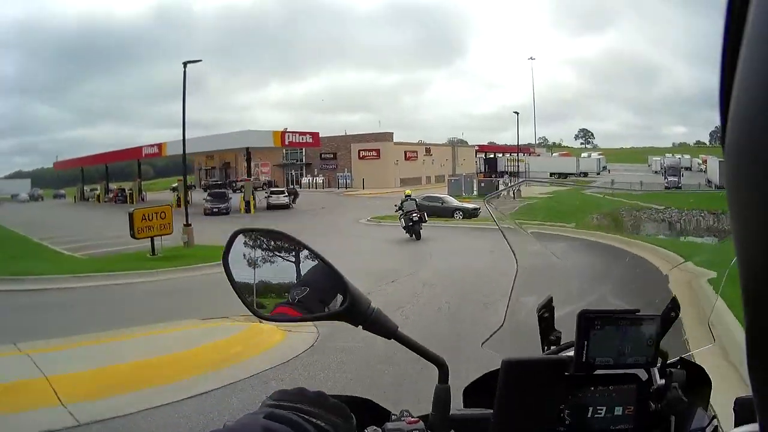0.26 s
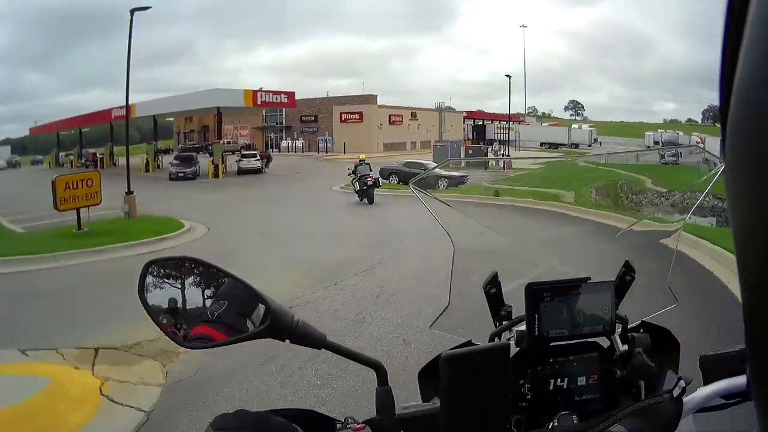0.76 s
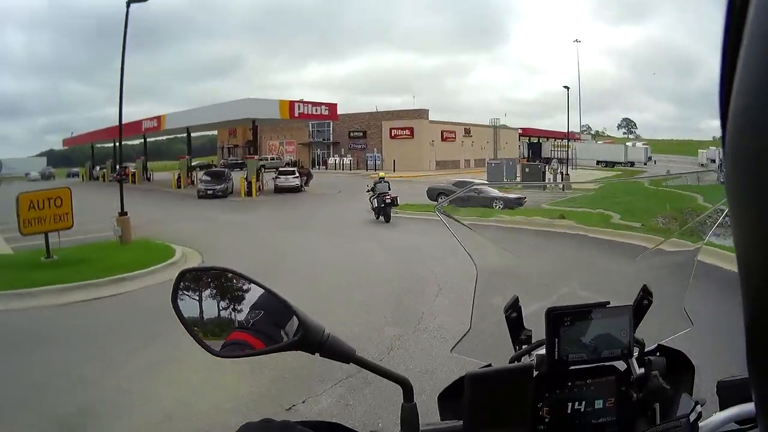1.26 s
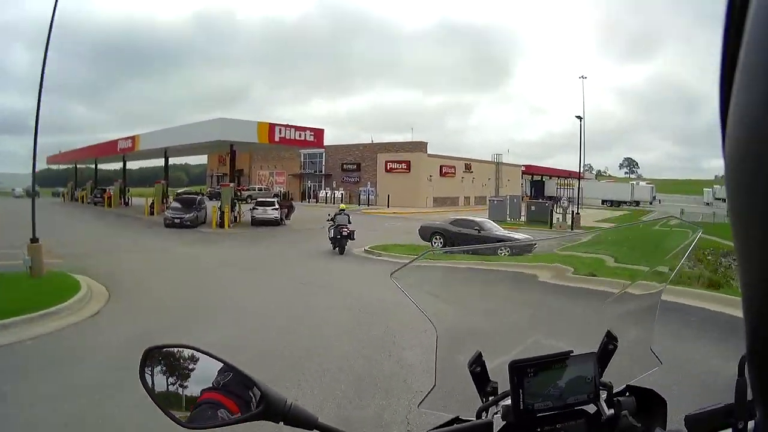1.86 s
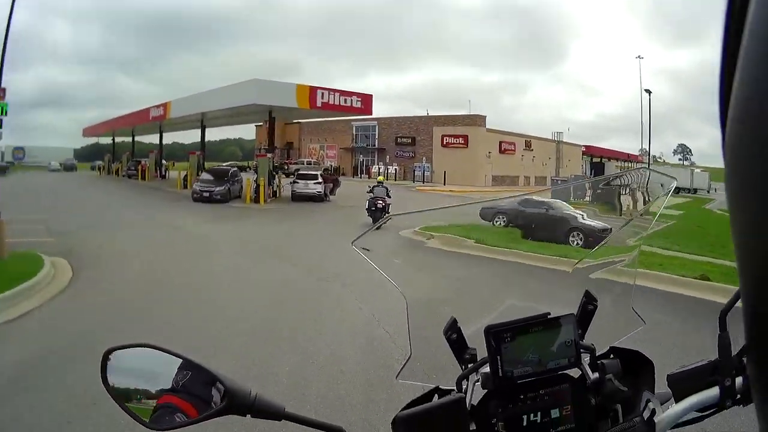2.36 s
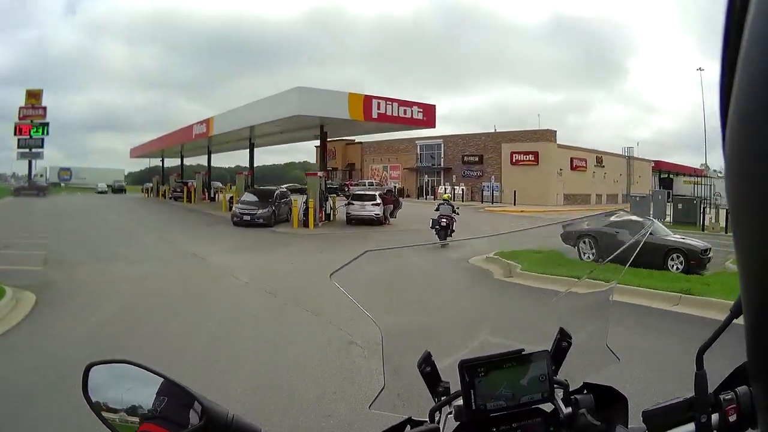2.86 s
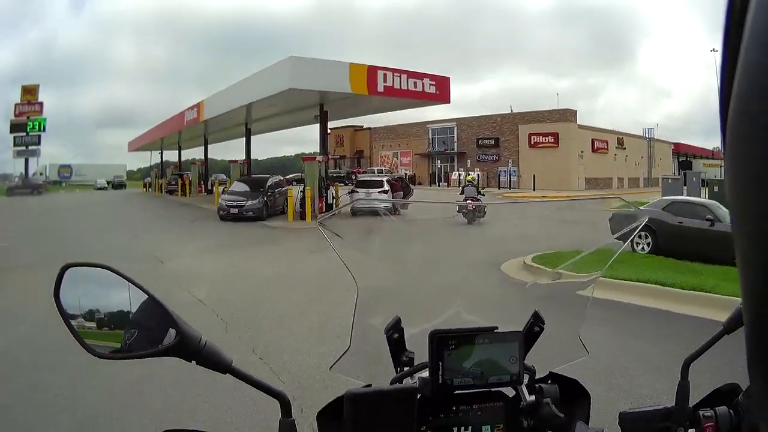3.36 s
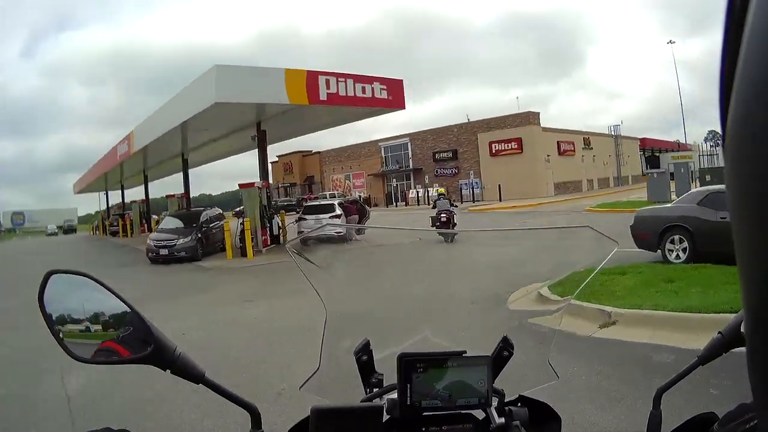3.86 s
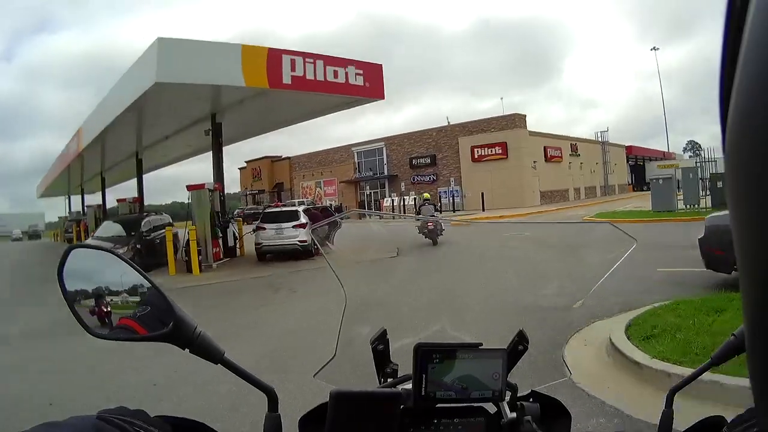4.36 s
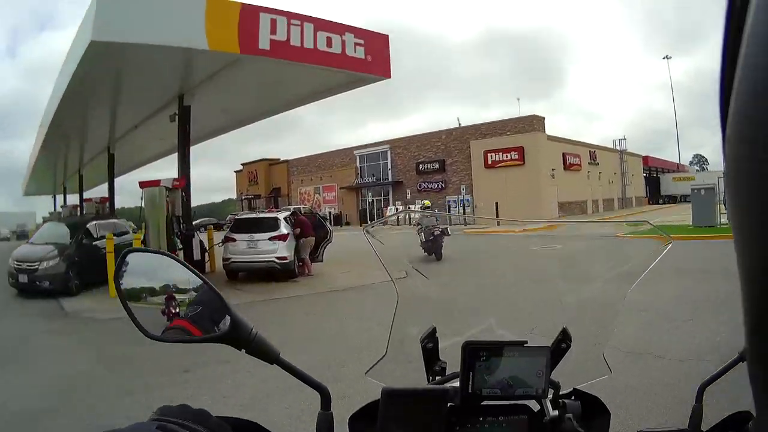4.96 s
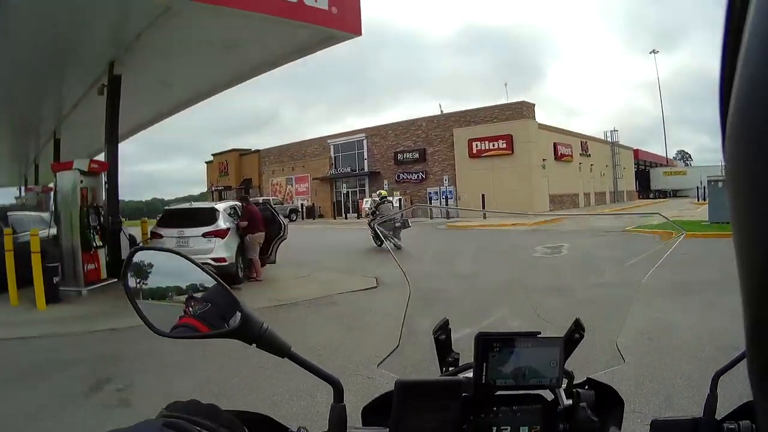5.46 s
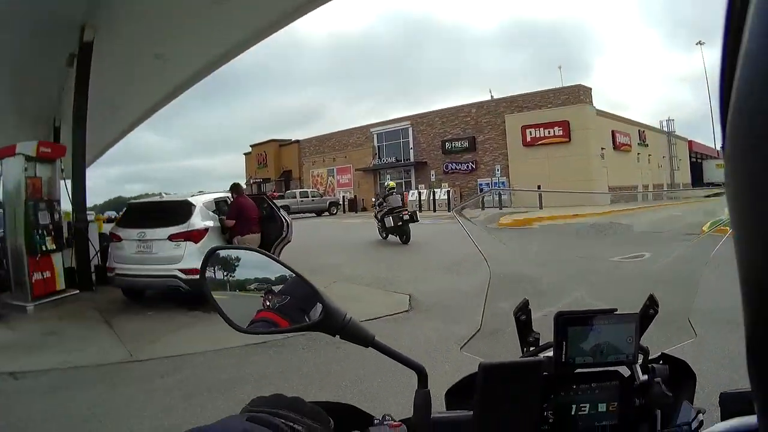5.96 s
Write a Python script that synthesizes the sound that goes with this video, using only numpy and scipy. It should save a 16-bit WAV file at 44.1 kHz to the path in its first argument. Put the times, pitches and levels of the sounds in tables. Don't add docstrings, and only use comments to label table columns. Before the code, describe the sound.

A close, mono helmet microphone on a motorcycle rolling slowly across an open forecourt. Throughout, a two-cylinder engine throbs low and even at about 27 firings a second, with pulsing casing clatter, valve hiss and faint metallic tappet rings. The start opens on the tail of a gust, with quick pops and flutter. From 0.7 to 1.0 s, wind slaps the microphone hard, with deep thumps, cracks and strap flicks on the shell. Scattered lighter puffs follow until 1.6 s, then the engine dominates, dipping slightly in strength until about 3. Slaps return at 2.7 s and cluster from 3.1 to 3.5 s, with a sharp buckle knock near 3.17. Sparser bumps continue. Around 4.6 to 4.95 s a thin gear whine rises briefly and slides down as the clutch goes in; the engine slows to a softer idle near 20 beats a second. Heavy thumps come at 5.6 to 5.7 s, smaller ones near 6.

```python
import sys
import numpy as np
from scipy import signal
from scipy.fft import rfft, irfft
from scipy.io import wavfile
from scipy.ndimage import uniform_filter1d

SR = 44100
rng = np.random.default_rng(int(sys.argv[2]) if len(sys.argv) > 2 else 0)


def store_pcm(level_fs):
    pcm = np.round(np.clip(level_fs, -1, 1) * 32767).astype(np.int16)
    wavfile.write(sys.argv[1], SR, np.atleast_2d(pcm).T)


def convert_level_to_amplitude(level_db):
    exponent = np.asarray(level_db, float) / 20
    return 10 ** exponent


N = 273420
T = np.arange(N) / SR

# time in seconds, turns counted so far.
CRANK_TURNS = [(0, .35), (.5, 13.6), (1, 27.2), (1.5, 41.1), (2, 55.05), (2.5, 69.1), (3, 83.0),
               (3.5, 96.8), (4, 110.4), (4.5, 123.9), (4.75, 130.4), (5, 136.3), (5.25, 141.3),
               (5.5, 146.25), (6, 156.2), (6.2, 160.1)]
# time in seconds, load in dB.
ENGINE_LOAD = [(0, 1), (.53, 1), (1.6, 1), (1.67, -2.5), (1.9, -4.5), (2.05, -2.5), (2.07, -0.5),
               (2.11, -3.5), (2.3, -1), (2.66, -5), (2.78, -0.3), (2.9, -3.5), (3.06, 0), (3.8, 0.35),
               (5.33, -1.5), (6.2, -1)]
# multiple of crank speed, level in dB.
EXHAUST_ORDERS = [(.5, -18), (1, -4), (1.5, -14), (2, -1), (2.5, -13), (3, -6), (3.5, -17), (4, -8),
                  (5, -10), (6, -19), (7, -13), (8, -20), (9, -15), (10, -14)]
# frequency in Hz, level in dB per Hz.
CASING_COLOUR = [(200, -10), (280, -13), (340, -7.5), (700, -5.5), (1150, -11.5), (1460, -9.5),
                 (1800, -17.5), (2350, -21.5), (2800, -30), (3700, -31), (5000, -29)]
# frequency in Hz, level in dB per Hz.
VALVE_COLOUR = [(2000, 0.5), (3400, -4.5), (4100, -7), (4900, -2.5), (6000, -5), (7700, -4), (9400, 0),
                (11000, -3.5), (13300, -6.5), (14600, -18)]
# frequency in Hz, level in dB per Hz.
FIZZ_COLOUR = [(5500, -9), (7600, -3), (8700, 1.5), (9400, 4.5), (10300, 0.5), (12500, -6), (14500, -35)]
# time in seconds, pitch in Hz, level in dB.
GEAR_WHINE = [
    (3.0, 4720, -80),
    (3.3, 4700, -65),
    (4.35, 4760, -63),
    (4.5, 4740, -66),
    (4.6, 4700, -59.5),
    (4.78, 4680, -59),
    (4.835, 4630, -53),
    (4.87, 4450, -59),
    (4.92, 4380, -59),
    (4.97, 4350, -80),
]
# time in seconds, pitch in Hz, level in dB.
TAPPET_RING = [(0, 2330, -53), (.7, 2400, -54), (1.5, 2350, -70), (4.95, 2350, -62), (5.15, 2320, -55),
               (5.3, 2320, -52), (5.6, 2330, -53), (6.2, 2350, -53)]
# time in seconds, pitch in Hz, level in dB.
ROCKER_RING = [(0, 1450, -58), (1.8, 1480, -55), (2.5, 1450, -55), (3, 1450, -60), (5.0, 1450, -58),
               (5.3, 1420, -52), (6.2, 1420, -52)]
# time in seconds, depth in dB, width in ms, crack in dB.
HARD_TUGS = [(.0013, -19, 0.69, -26.5), (.0378, -16.5, 4, -29.5), (.0149, -19, 0.63, -28),
             (.0161, -19, 0.73, -32), (.027, -21, 2.2, -32), (.6984, -8, 1.54, -24.5),
             (.8014, -19, 0.78, -39), (.8254, -10.5, 2.6, -24.5), (.8329, -5, 3.2, -35),
             (.7077, -13.5, 2, -34), (.9053, -24, 3, -40), (2.728, -14, 2, -40), (4.8519, -15, 1.4, -44),
             (3.1363, -15, 0.94, -38), (.8459, -19, 0.49, -27), (.8942, -2.5, 2.7, -18.5),
             (.9686, -10, 2.2, -35), (1.2497, -16.5, 1.7, -58), (1.4336, -18, 1, -46),
             (2.7167, -13.5, 2, -38), (2.7881, -5.5, 2.44, -34.5), (2.8172, -18.5, 1.6, -31),
             (3.1262, -15, 1.03, -40), (3.1659, -10, 2.8, -36), (3.1755, -11, 1.8, -34),
             (3.2372, -8, 1.47, -31.5), (3.2357, -12, 1.5, -34), (3.461, -16, 1.5, -30),
             (3.4908, -13.5, 3., -38), (3.503, -21, 1.1, -33), (3.8926, -12.5, 3.9, -45),
             (4.013, -13.5, 1.5, -35), (4.3939, -11, 2.5, -48), (4.8293, -21.5, 1.1, -28),
             (4.847, -11.5, 1.5, -30.5), (4.8847, -17, 2.2, -30), (5.6872, -3.5, 3.6, -35),
             (5.712, -11, 2.7, -41), (5.7005, -18, 2.4, -51), (5.6825, -9, 4.2, -44),
             (3.173, -18, 1.6, -30), (5.9546, -10, 1.27, -46), (5.9736, -14.5, 1.9, -31)]
# time in seconds, depth in dB.
SOFT_TUGS = [(0.283, -20), (0.5248, -27), (0.6825, -12.5), (0.757, -13), (0.7333, -14.5), (0.719, -11.5),
             (0.7458, -18), (0.768, -16), (0.807, -7), (0.938, -15), (1.0788, -14.5), (1.2024, -16.5),
             (1.4077, -13.5), (1.56, -23.5), (1.63, -33), (2.7308, -9), (2.991, -19), (3.1, -9),
             (3.2624, -17), (3.3866, -16), (3.431, -18), (3.58, -15.5), (3.707, -22), (3.927, -17.5),
             (4.534, -20), (4.6216, -19), (4.768, -17), (4.892, -15.5), (4.895, -16), (4.978, -14.5),
             (5.302, -17.5), (5.6201, -11), (5.6145, -15), (5.6123, -7), (5.819, -14.5), (6.1631, -13.5),
             (6.1861, -10), (6.172, -17), (5.966, -15), (5.984, -19)]
# time in seconds, height in dB, width in ms.
PUSHES_IN = [(.0045, -18, 3.), (.013, -19, 3.1), (0.0315, -14, 1), (0.05, -15, 4.), (.186, -18, 1.8),
             (0.2611, -15.5, 1.7), (0.687, -18, 3.), (.829, -16.5, 2.6), (.8382, -11, 3.2),
             (0.9077, -10, 3.3), (0.9814, -9.5, 1.8), (4.674, -16, 2.5), (5.092, -22, 2.1),
             (5.256, -18, 4.1), (1.0735, -22, 3.8), (1.0826, -19, 2.3), (1.192, -15, 1.35),
             (1.416, -18, 3.6), (2.722, -14, 3.5), (2.735, -19, 3.4), (2.7913, -8.5, 2), (2.9365, -14, 2.3),
             (2.994, -16.5, 4.7), (3.0253, -15.5, 2.2), (3.05, -17, 2.5), (3.069, -15, 2.5),
             (3.079, -15, 2.), (3.141, -20, 3.5), (3.159, -19, 2.3), (3.18, -21, 4.), (3.2144, -12, 3.2),
             (3.8937, -16, 3.2), (4.0071, -17, 1.3), (3.244, -18, 2.4), (3.26, -13, 1.06), (3.264, -7, 2),
             (3.35, -18, 2.5), (3.381, -15, 1.4), (3.431, -14, 1.7), (3.4425, -20, 2.5), (3.4942, -16, 3.7),
             (3.5749, -16.5, 3.1), (4.83, -21, 0.86), (4.8453, -19, 1.2), (4.89, -27, 3.3),
             (5.5993, -11.5, 1.4), (5.6062, -10.5, 2.8), (5.616, -13.5, 2.7), (5.693, -20, 4.),
             (5.7065, -19, 2.9), (5.7166, -9, 3.6), (5.827, -18, 2.7), (5.9589, -15, 2.8),
             (6.1918, -14, 1.3), (6.1956, -12, 1.7)]
# time in seconds, level in dB, length in ms.
STRAP_FLICKS = [(.014, -36, 6.), (.6972, -31, 2.5), (.73, -37, 4.), (.785, -37, 4.), (.8005, -31, 1.9),
                (.826, -35, 3.), (.832, -36, 3.), (.8375, -36, 2.5), (.8452, -32, 2.), (.9005, -34, 4.),
                (.905, -35, 3.), (1.0615, -39, 3.), (1.2005, -41, 3.), (1.2465, -38, 3.),
                (2.7155, -35, 2.5), (2.741, -36, 3.), (2.7875, -32, 3.), (2.8165, -36, 2.),
                (2.935, -39, 2.5), (2.9922, -40, 3.), (3.1235, -35, 3.), (3.185, -37, 3.),
                (3.1965, -33, 3.5), (3.21, -38, 2.8), (3.2355, -34, 4.), (3.2583, -32, 2.),
                (3.4282, -38, 4.), (3.4601, -33, 2.5), (3.473, -37, 4.), (3.5015, -37, 3.),
                (3.6447, -41, 3.), (3.9036, -35, 2.5), (3.942, -39, 3.), (4.392, -38, 3.), (4.767, -39, 3.),
                (4.8272, -35, 3.), (4.833, -38, 3.), (4.852, -37, 2.5), (4.8809, -37, 2.5),
                (4.8845, -37, 2.5), (5.598, -37, 4.), (5.691, -37, 3.), (5.697, -37, 3.), (5.7115, -35, 4.),
                (5.784, -43, 3.), (5.825, -39, 3.2), (5.949, -41, 3.), (5.9714, -35, 3.)]
# time in seconds, level in dB, length in ms, share reaching the top of the shell (0-1).
BUCKLE_STRIKES = [(3.165, -20, 3., .65), (3.1732, -27, 3.5, .2), (4.8458, -33, 2.6, .6),
                  (5.6856, -33, 2.6, .7), (3.1636, -30, 1.8, .5), (3.1662, -28, 1.8, .6),
                  (.8107, -35, 1.8, .6), (.8192, -28, 3., .15), (.8945, -29, 3., .15),
                  (4.0122, -36, 2.2, .5), (5.6875, -35, 2.5, .4)]
# frequency in Hz, level in dB per Hz.
CRACK_COLOUR = [(300, -13), (550, 4.5), (1000, 3), (1700, -3.5), (2400, -13.5), (3200, -35), (5000, -51),
                (7000, -60)]
# frequency in Hz, level in dB per Hz.
SHELL_COLOUR = [(500, -40), (1300, 5), (2500, 6), (3300, -12), (4600, -10), (5500, -26), (6500, -48)]
# frequency in Hz, level in dB per Hz.
DULL_SHELL_COLOUR = [(300, -30), (700, 9.5), (1500, 9), (2400, -7.5), (3200, -18), (4800, -40)]
# time in seconds, buffeting in dB.
AIRSTREAM = [(0, -19), (.03, -20.5), (.08, -31), (.64, -27), (.78, -18.5), (1., -28), (1.13, -37),
             (1.4, -31.5), (1.55, -48), (1.74, -40), (2.3, -32), (2.68, -35.5), (2.74, -28), (3.06, -22),
             (3.6, -23.5), (4.13, -29.5), (4.5, -26.5), (4.75, -28), (5.05, -26), (5.4, -28.5),
             (5.6, -24.5), (6.2, -25)]
# frequency in Hz, level in dB per Hz.
BUFFET_COLOUR = [(8, -15), (22, -3.5), (60, 2), (120, -3.5), (200, -9.5), (350, -18.5), (700, -63)]
# frequency in Hz, level in dB per Hz.
EDGE_COLOUR = [(60, -54), (160, -1), (300, 2), (600, -4), (1200, -17.5), (2500, -57), (5000, -56)]
# frequency in Hz, level in dB per Hz.
BITE_COLOUR = [(50, -27), (100, 7.5), (150, -6), (250, -2), (450, -13)]


def engine():
    speed = uniform_filter1d(np.gradient(follow(CRANK_TURNS)[0]), size=9000)
    turns = CRANK_TURNS[0][1] + np.cumsum(speed)
    speed_hz = speed * SR
    load_db = follow(ENGINE_LOAD)[0]
    rolling_hz, clatter_per_db = 28.65, 1.53
    hiss_db = -57 + load_db
    clatter_db = clatter_per_db * load_db
    beat_db = -32 + 1.43 * load_db + 0.7 * np.minimum(speed_hz - rolling_hz, 0)

    wobble = turns + .008 * drift(5.)
    beat = exhaust_beat(speed_hz, wobble)
    fizz = .95 * coloured(FIZZ_COLOUR, noise()) * firings(turns, .22, .03, .4)
    clatter_swell = 1 + .6 * firings(turns, .25, .08, .35)
    hiss = coloured(VALVE_COLOUR, noise()) * convert_level_to_amplitude(.5 * drift(40.)) + fizz
    clatter = coloured(CASING_COLOUR, noise()) * clatter_swell * convert_level_to_amplitude(0.18 * drift(33.0))

    rings = ring(GEAR_WHINE, firings(turns, .27, -.62, .85), 35, .005)
    rings += ring(TAPPET_RING, firings(turns, .17, -.02, .9), 30, .06)
    rings += ring(ROCKER_RING, firings(turns, .17, .08, .7), 70, .03)
    rings += pipe_ring(speed_hz, wobble, -56 + clatter_db)
    return (convert_level_to_amplitude(beat_db) * evened(beat) + convert_level_to_amplitude(hiss_db) * evened(hiss)
            + convert_level_to_amplitude(-46 + clatter_db) * evened(clatter) + rings)


def exhaust_beat(speed_hz, turns):
    boom_hz, boom_width_hz, boom_db = 102, 7, 8
    beat = np.zeros(N)
    for order, level_db in EXHAUST_ORDERS:
        boom = boom_db * np.exp(-((order * speed_hz - boom_hz) / boom_width_hz) ** 2)
        level = convert_level_to_amplitude(level_db + boom + 1.5 * drift(4.))
        beat += level * np.cos(2 * np.pi * (order * turns + rng.random()))
    return beat


def pipe_ring(speed_hz, turns, level_db):
    pipe_hz, pipe_width_hz = 554, 235
    out = np.zeros(N)
    for order in range(14, 30):
        near_pipe = np.exp(-((order * speed_hz - pipe_hz) / pipe_width_hz) ** 2)
        level = near_pipe * convert_level_to_amplitude(level_db + 3.6 * drift(5.0))
        out += level * np.cos(2 * np.pi * (order * turns + rng.random()))
    return out


def firings(turns, width, early, far):
    shifted = turns + early
    count = np.round(shifted).astype(int)
    strength = np.where(count % 2, 1, far) * convert_level_to_amplitude(1.25 * rng.standard_normal(200)[count])
    return strength * np.exp(-((shifted - count) / width) ** 2)


def ring(rows, gate, wander_hz, climb):
    hz, level_db = follow(rows)
    slope = np.gradient(gate) / (gate + .02)
    pitch = hz * (1 - climb * np.tanh(evened(slope))) + wander_hz * (drift(150.) + drift(15.))
    level = convert_level_to_amplitude(level_db - 2 + 2 * drift(200.) + drift(12.))
    return level * gate * np.sin(2 * np.pi * np.cumsum(pitch) / SR)


def slaps():
    out, bursts = np.zeros(N + 4096), rng.standard_normal((200, 1024))
    tugs = eddies()
    for (s, depth_db, width_ms, crack_db), row in zip(tugs, bursts):
        add_tug(out, s, depth_db, width_ms, crack_db, row)
    out = vented(out)
    for s, height_db, width_ms in PUSHES_IN:
        add_at(out, s, -convert_level_to_amplitude(height_db) * dip(width_ms))
    out = vented(out, hz=25.)[512:]
    for (s, level_db, length_ms), row in zip(STRAP_FLICKS, bursts[::-1]):
        add_at(out, s, convert_level_to_amplitude(level_db) * puff(DULL_SHELL_COLOUR, length_ms, row, 18))
    for (s, level_db, length_ms, bright), row in zip(BUCKLE_STRIKES, bursts[len(tugs):]):
        hard = puff(SHELL_COLOUR, length_ms, row, 14.)
        soft = puff(DULL_SHELL_COLOUR, length_ms, row, 14.)
        add_at(out, s, convert_level_to_amplitude(level_db) * (bright * hard + (1 - bright) * soft))
    out[:500] -= .24 * np.cos(2 * np.pi * 105 * T[:500]) * np.hanning(1000)[500:] ** .4
    return out[:N]


def add_tug(out, s, depth_db, width_ms, crack_db, row):
    row = evened(row - 3 * (np.arange(1024) == 512))
    shell = np.clip((crack_db - depth_db + 8.5) / 18, 0, 1)
    crack = (1 - shell) * coloured(CRACK_COLOUR, row) + shell * coloured(SHELL_COLOUR, row)
    crack = crack * dip(4.2)
    thud_hz, thud_t60_s, t = 615 * convert_level_to_amplitude(row[0]), 0.029, T[:1024]
    thud = np.sin(2 * np.pi * thud_hz * t) * convert_level_to_amplitude(-60 * t / thud_t60_s)
    start = round(s * SR) + 512
    out[start:start + 1024] += convert_level_to_amplitude((depth_db + crack_db) / 2 - 4) * thud
    add_at(out, s, convert_level_to_amplitude(depth_db + 1.5) * dip(width_ms) + convert_level_to_amplitude(crack_db - 6.5) * crack)
    add_at(out, s + .0093, convert_level_to_amplitude(depth_db - 15) * dip(1.3 * width_ms))


def eddies():
    return HARD_TUGS + [(s, db, 2.24, db - 35) for s, db in SOFT_TUGS]


def dip(width_ms):
    ms = (np.arange(1024) - 512) / SR * 1000
    return -np.exp(-(ms / (0.54 * max(width_ms, .3))) ** 2)


def vented(x, hz=152.0):
    return signal.lfilter([1, -1], [1, -np.exp(-2 * np.pi * hz / SR)], x)


def puff(colour, ms, row, knock):
    u = np.arange(len(row)) / SR / (max(ms, .5) / 1000)
    blow = -knock * (np.arange(len(row)) == np.argmin(abs(3 * u - 1)))
    return coloured(colour, row + blow) * (3 * u) ** 2 * np.exp(1 - 6 * u)


def wind():
    buffet_db, edge_db = gusts()
    lumps = drift(36.0)
    low = coloured(BUFFET_COLOUR, noise()) * convert_level_to_amplitude(2.3 * lumps)
    edge = coloured(EDGE_COLOUR, noise()) * convert_level_to_amplitude(3.7 * lumps + 2.34 * drift(117.0))
    chance, size = rng.random((3, N)), convert_level_to_amplitude(2.8 * np.minimum(rng.exponential(1, N), 3))
    tugs = np.zeros(N)
    for c, width_ms in zip(chance, (.9, 1.5, 2.4)):
        tugs += signal.oaconvolve(size * (c < 30 / SR), dip(width_ms), "same")
    crackle = coloured(CRACK_COLOUR, noise()) * convert_level_to_amplitude(3.5 * drift(120.))
    crackle_db = 1.13 * (edge_db + 32.5) - 52.5
    ragged = convert_level_to_amplitude(edge_db - 2.5) * evened(edge) + convert_level_to_amplitude(edge_db - 3.0) * evened(vented(tugs))
    ragged += convert_level_to_amplitude(crackle_db) * evened(crackle)
    swell = np.sqrt(np.maximum(convert_level_to_amplitude(2 * buffet_db) - convert_level_to_amplitude(2 * follow(AIRSTREAM)[0]), 0))
    ragged += convert_level_to_amplitude(-3) * swell * coloured(BITE_COLOUR, noise())
    rising = np.minimum(T / .015, 1)
    return rising * (convert_level_to_amplitude(buffet_db - 3.0) * evened(low) + ragged)


def gusts():
    swell_s, swell_late_s, fray_rise_s, fray_fall_s = .022, .002, .0055, .014
    stream_db = follow(AIRSTREAM)[0]
    low = convert_level_to_amplitude(2 * stream_db)
    edge = convert_level_to_amplitude(2 * (-43 + 1.67 * (stream_db + 25.5)))
    for s, depth_db, _, crack_db in eddies():
        near = slice(max(round((s - .1) * SR), 0), round((s + .1) * SR))
        since = T[near] - s
        fray_db = depth_db - 21 + 0.25 * (crack_db - depth_db + 21)
        low[near] += convert_level_to_amplitude(2 * (depth_db - 23)) * np.exp(-((since - swell_late_s) / swell_s) ** 2)
        fray_s = np.where(since < 0, fray_rise_s, fray_fall_s)
        edge[near] += convert_level_to_amplitude(2 * fray_db) * np.exp(-(since / fray_s) ** 2)
    return 10 * np.log10(low), 10 * np.log10(edge)


def noise():
    return rng.standard_normal(N)


def evened(x):
    return x / np.sqrt(np.mean(x ** 2) + 1e-20)


def follow(rows):
    s, *columns = np.transpose(rows)
    return [np.interp(T, s, c) for c in columns]


def coloured(points, x):
    hz, level_db = np.transpose(points)
    f = np.fft.rfftfreq(len(x), 1 / SR)
    gain = convert_level_to_amplitude(np.interp(np.log(f + 1), np.log(hz), level_db, -90, -90))
    return evened(irfft(rfft(x) * gain, len(x)))


def drift(hz):
    pole = np.exp(-2 * np.pi * hz / SR)
    slow = signal.lfilter([1], np.convolve([1, -pole], [1, -pole]), rng.standard_normal(N + SR))
    return evened(slow[SR:])


def add_at(out, s, sound):
    start = round(s * SR)
    out[start:start + 1024] += sound


def scene():
    return (engine() + wind() + slaps())[None]


def low_pass(x):
    return signal.sosfilt(signal.butter(12, 14670, fs=SR, output="sos"), x)


def record(dry):
    ceiling = 1.1
    mix = ceiling * np.tanh(dry / ceiling)
    return low_pass(mix)


dry = scene()
out = record(dry)
store_pcm(out)
```